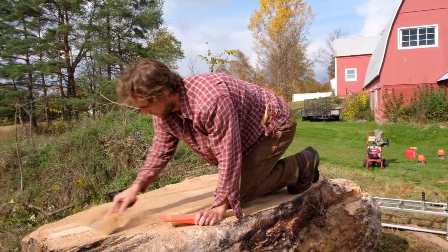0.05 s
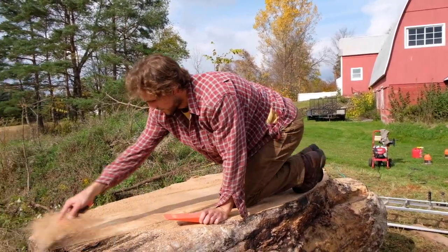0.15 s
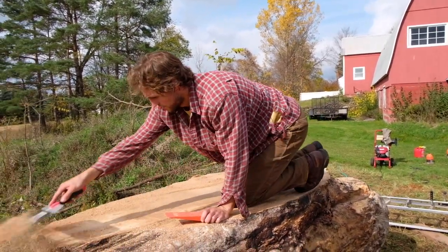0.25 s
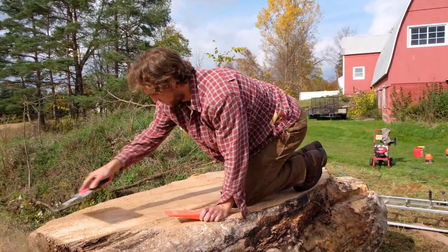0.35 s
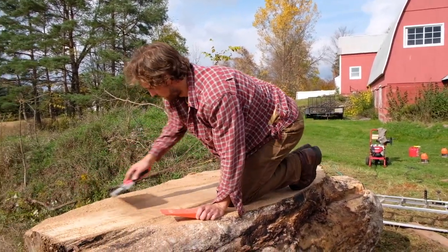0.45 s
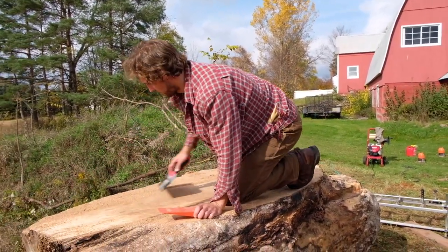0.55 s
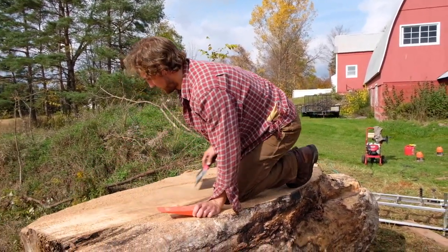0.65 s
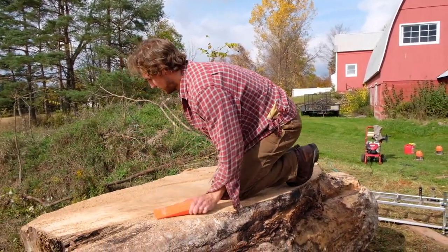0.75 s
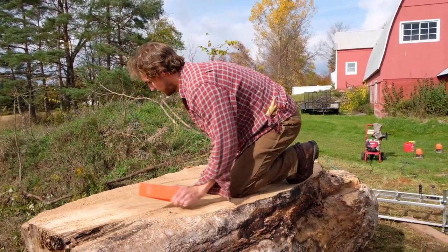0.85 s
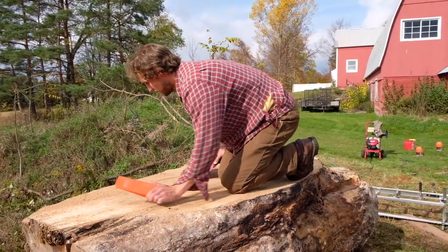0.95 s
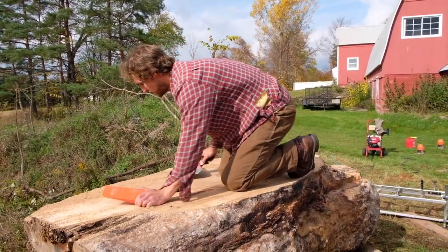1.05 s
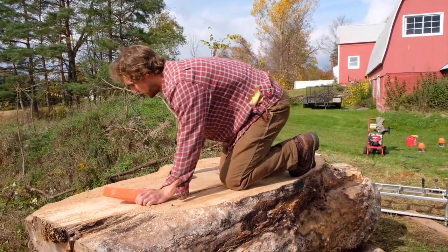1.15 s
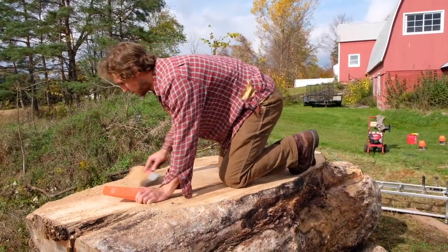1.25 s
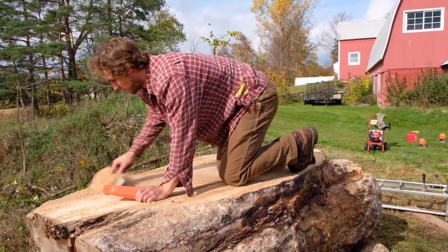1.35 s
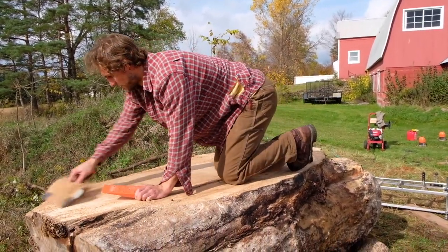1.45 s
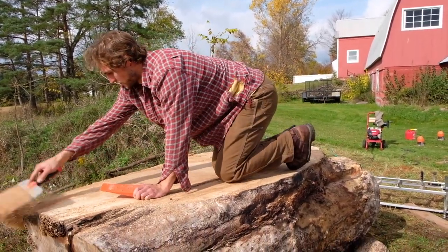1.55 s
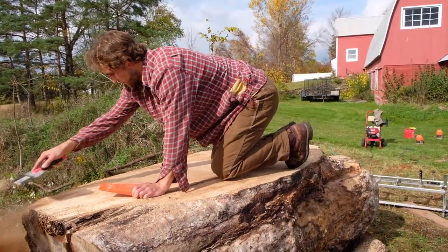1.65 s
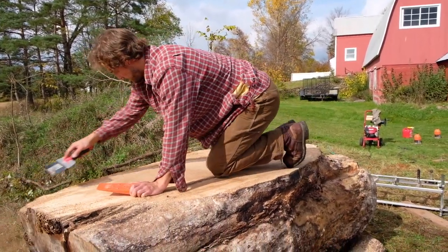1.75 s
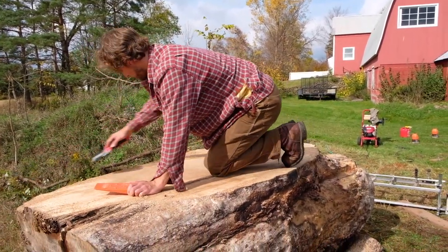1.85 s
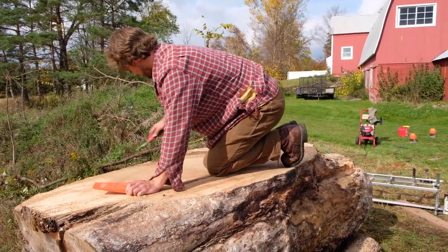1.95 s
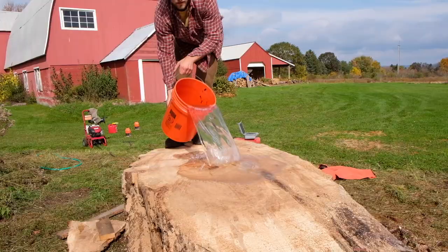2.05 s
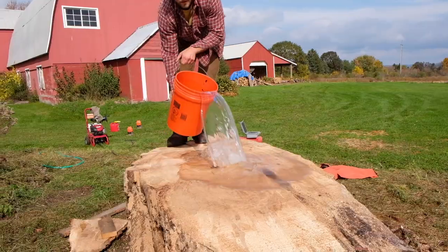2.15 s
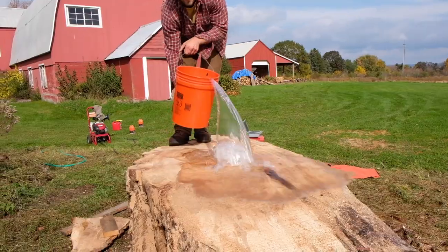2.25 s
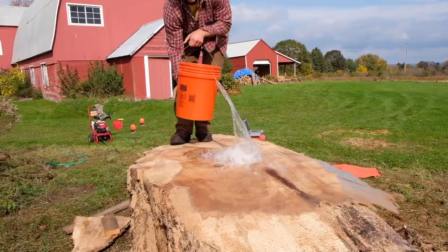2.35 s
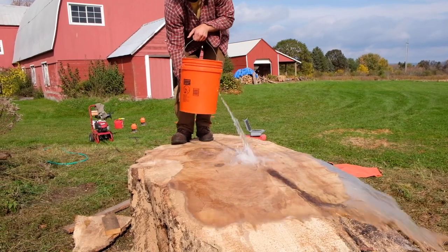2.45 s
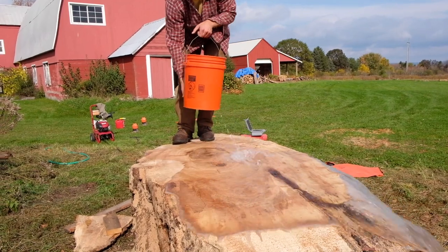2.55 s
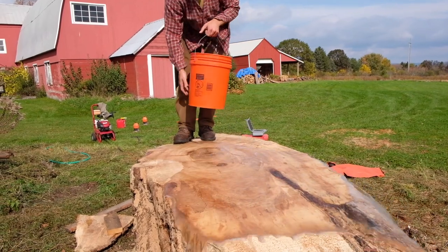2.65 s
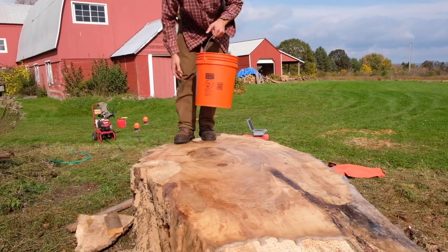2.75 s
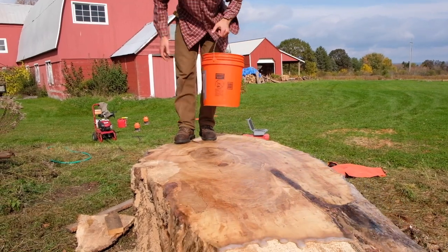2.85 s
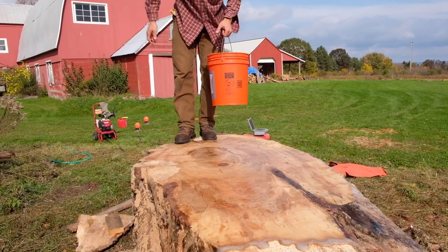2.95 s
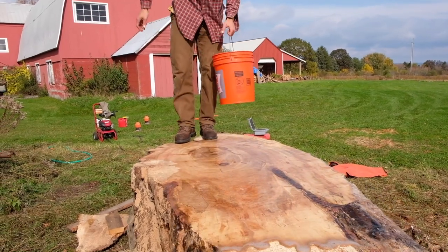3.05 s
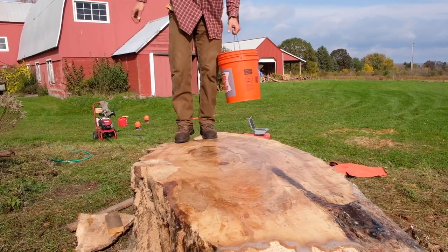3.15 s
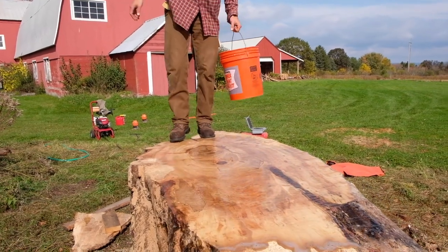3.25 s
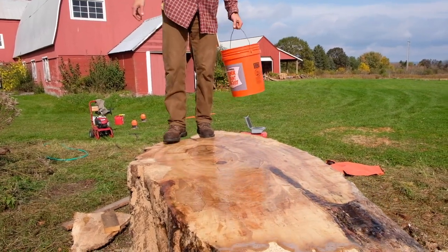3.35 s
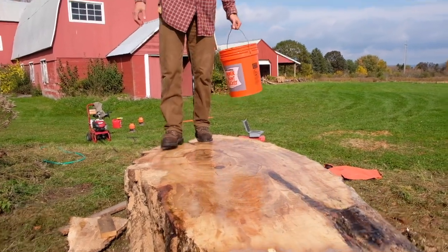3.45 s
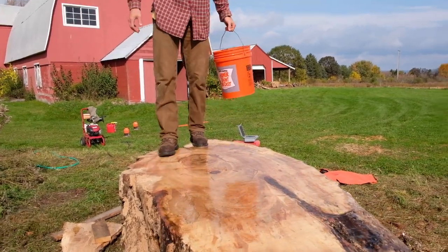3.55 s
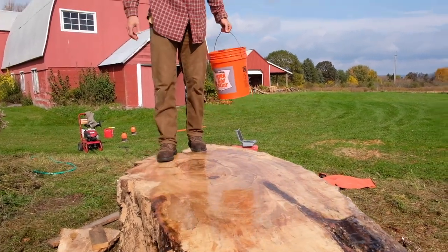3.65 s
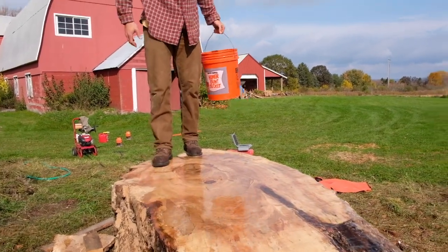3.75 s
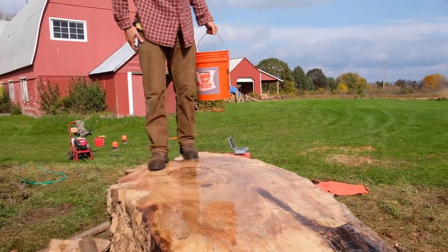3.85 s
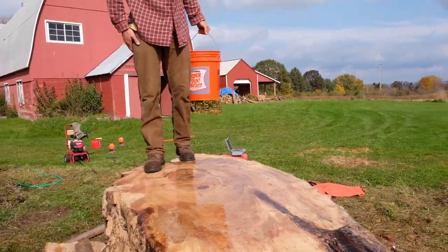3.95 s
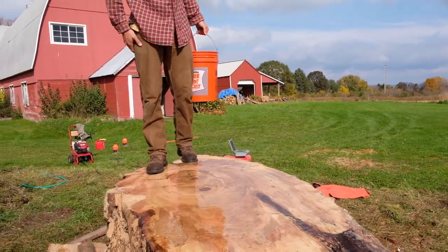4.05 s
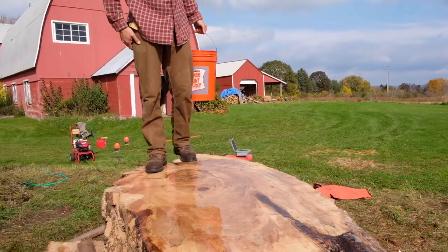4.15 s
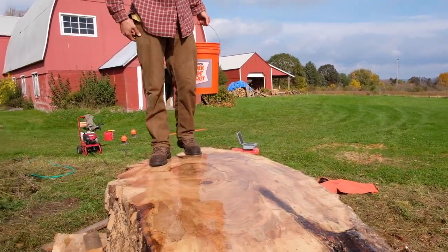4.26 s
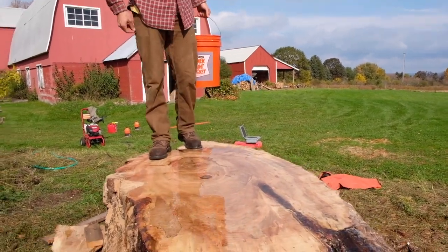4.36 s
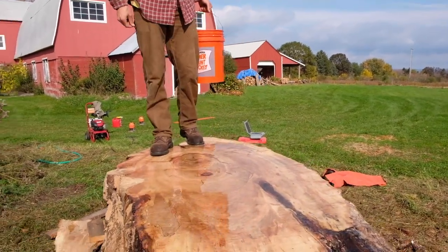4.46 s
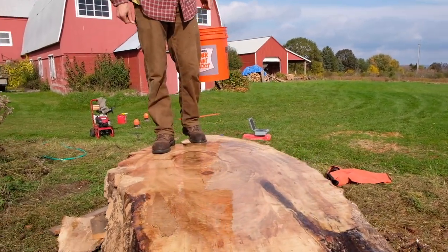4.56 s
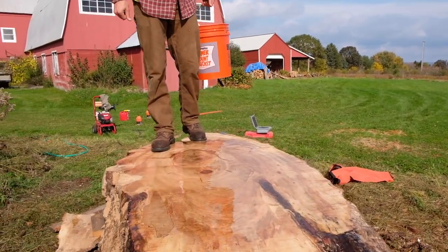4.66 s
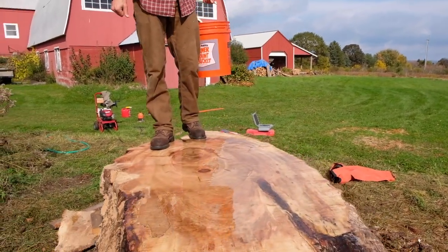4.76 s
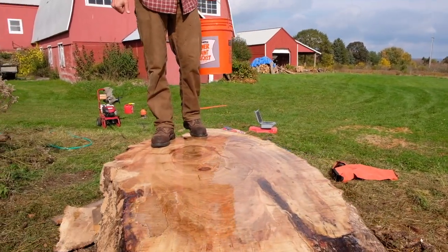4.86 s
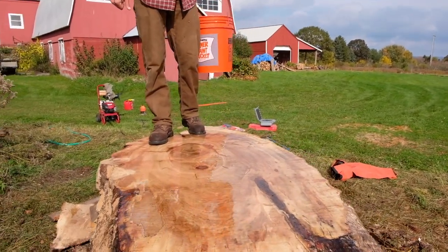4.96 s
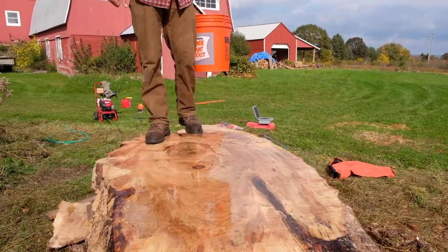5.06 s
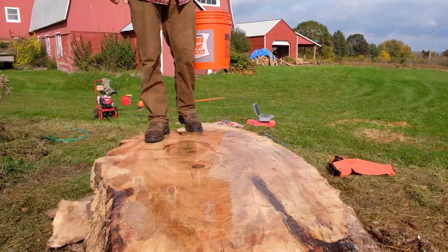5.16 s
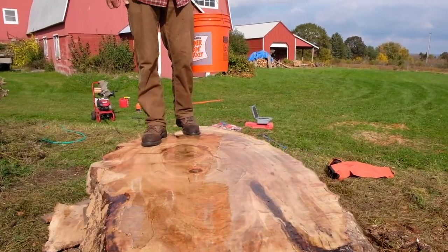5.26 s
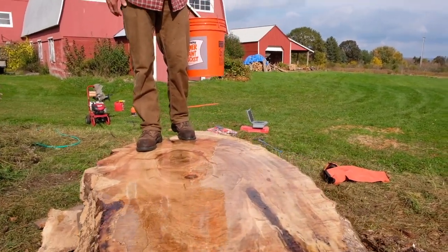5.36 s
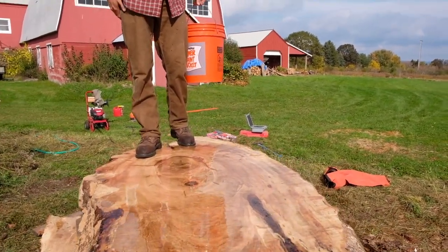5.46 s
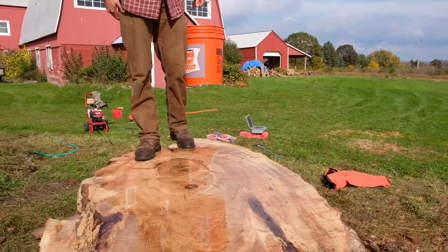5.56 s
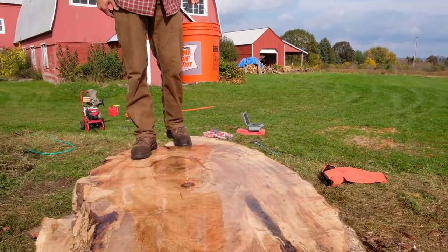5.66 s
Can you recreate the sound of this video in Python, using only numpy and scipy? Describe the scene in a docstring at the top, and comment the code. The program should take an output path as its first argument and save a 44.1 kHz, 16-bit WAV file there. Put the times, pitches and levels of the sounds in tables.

```python
"""A hand brush sweeps sawdust off a sawn slab in two brisk strokes, the first already under way: bristles are
showers of tiny impacts, ringing through handle and wood. Then a bucket of water is poured on the wood, made of
impacts and bubbles; the last slug lands with a thud, the water spills over the edge in surges, spatters on the
ground and drips away. A few dull knocks of boots and bucket follow as damped rings. Quiet country air is
coloured noise, a far rumble and a breeze in the grass; the background steps up at 2.1 s."""
import sys
import numpy as np
from scipy import signal
from scipy.fft import rfft, irfft
from scipy.io import wavfile
from scipy.ndimage import uniform_filter1d

SR = 44100
rng = np.random.default_rng(int(sys.argv[2]) if len(sys.argv) > 2 else 0)


def file_out(sig):
    """Save sig as 16-bit WAV at sys.argv[1]."""
    # one column per channel
    cols = np.atleast_2d(sig).T
    # limit, then scale
    lim = np.clip(cols, -1, 1)
    pcm = np.round(lim * 32767).astype(np.int16)
    wavfile.write(sys.argv[1], SR, pcm)


N = 251370
T = np.arange(N) / SR
FREQS = np.fft.rfftfreq(N, 1 / SR)
SIDES = np.array([[1], [-1]])  # left, right


def amp(db):
    """Decibels to gain."""
    return 10 ** (np.asarray(db) / 20)


def gains(rows):
    """Gain curves over time from rows of start_s and one or more level_db."""
    s, *columns = np.transpose(rows)
    return [amp(np.interp(T, s, column)) for column in columns]


def colour(x, points):
    """Filter by a spectrum of (Hz, dB) points; minimum phase, so that clicks keep their sharp front."""
    hz, db = np.transpose(points)
    size = 4096
    grid_hz = np.fft.rfftfreq(size, 1 / SR)
    curve_db = np.interp(np.log(grid_hz + 1), np.log(hz), db)
    # fold the cepstrum forward in time to get the minimum-phase response
    cepstrum = irfft(np.log(amp(curve_db)))
    cepstrum[1:size // 2] *= 2
    cepstrum[size // 2 + 1:] = 0
    response = irfft(np.exp(rfft(cepstrum)))
    return irfft(rfft(x) * rfft(response, N), N)


def unit(x, band=(20, 20000)):
    """Scale to rms 1 within a band in Hz."""
    inside = (FREQS > band[0]) & (FREQS < band[1])
    return x / np.sqrt(np.mean(irfft(rfft(x) * inside, N) ** 2))


def resonate(x, hz, width_hz):
    """Two-pole resonance, gain 1 at the centre."""
    b, a = signal.iirpeak(hz, hz / min(width_hz, SR / 4), fs=SR)
    return signal.lfilter(b, a, x)


def walk(rate):
    """Smooth random drift, spread near 1, from random steps at a rate per second."""
    k = int(SR / rate)
    steps = np.repeat(rng.standard_normal(N // k + 1), k)
    return 1.3 * uniform_filter1d(uniform_filter1d(steps, k), k)[:N]


def impacts(rate, spread_db):
    """Tiny random impacts, rate a second, a few much larger than the rest."""
    size = amp(spread_db * np.minimum(rng.standard_exponential(N), 4))
    return (rng.random(N) < rate / SR) * rng.choice([-1, 1], N) * size


def ping(hz, cycles, glide=0):
    """A short ring that swells for some cycles and dies; its pitch may glide up."""
    samples = np.arange(int(10 * cycles / hz * SR))
    age = samples / SR * hz / cycles  # 1 at the crest
    return age * np.exp(1 - age) * np.sin(2 * np.pi * cycles * age * (1 + glide * age / 10))


def add(track, s, sound):
    """Mix a sound into a track at a time in seconds."""
    i = max(int(s * SR), 0)
    track[..., i:i + sound.shape[-1]] += sound[..., :max(N - i, 0)]


def bubbles(low_hz, high_hz, cycles, spread_db, count):
    """A steady cloud of bubbles of many sizes, each a ping of rising pitch."""
    out = np.zeros(N)
    for when, pitch, life, size in rng.random((count, 4)):
        gain = amp(-spread_db * np.log(size + .04))
        hz = low_hz * (high_hz / low_hz) ** pitch
        add(out, when * N / SR, gain * ping(hz, cycles * (.5 + life), glide=0.18))
    return unit(out)


def splats(rate):
    """Drops that each burst into a millisecond of fresh spray."""
    hits = impacts(rate, spread_db=5.3) / np.sqrt(rate)
    keep = np.exp(-1 / (.001 * SR))
    burst = np.sqrt(signal.lfilter([1 - keep], [1, -keep], hits ** 2))
    return unit(hits + burst * rng.standard_normal(N))


def spread(make, width):
    """Stereo from two draws of a source: one is common, the other differs between the ears."""
    return make() + SIDES * colour(make(), width)


def ramp(start_s, end_s):
    """Rises from 0 to 1 between two times."""
    return np.clip((T - start_s) / max(end_s - start_s, 1 / SR), 0, 1)


RELEASE_S = 0.0055  # bristles spring off the wood


def contact(start_s, end_s, attack_s):
    """1 between two times; swells in before and is cut fast after."""
    return np.exp(-np.maximum(start_s - T, 0) / attack_s - np.maximum(T - end_s, 0) / RELEASE_S)


# spectrum of the far rumble: pitch_hz [Hz], level_db [dB]
AIR_SPECTRUM = [(20, -20), (40, -7), (70, -2.5), (110, 1.5), (165, -4.5), (290, -9.5), (500, -13.5),
                (850, -13.5), (1100, -19), (2000, -23.5), (3200, -32), (5000, -37.5), (11000, -46),
                (15000, -61)]
AIR_DB = -57.5
# breeze in the grass, faint, with a step up in the background at 2.1 s, then wavering: start_s [s], level_db
# [dB]
BREEZE_LEVELS = [(0, -67.5), (2.1, -72), (2.2, -58), (4.8, -64), (5.2, -57.5), (5.7, -61)]
# spectrum of the breeze: pitch_hz [Hz], level_db [dB]
BREEZE_SPECTRUM = [(100, -15.5), (200, 1.5), (450, -3), (900, -2), (1500, -8.5), (3000, -33.5),
                   (8000, -31.5), (15000, -40.5)]
# side against mid, for rumble and breeze: pitch_hz [Hz], level_db [dB]
AIR_SIDE = [(30, -16), (110, -10.5), (400, -4.5), (1000, -9), (3000, 0), (15000, 2)]


def air():
    """Coloured noise: a far low rumble, and a breeze in the grass, faint until the background steps up at 2.1
    s, then wavering."""
    far = spread(lambda: unit(colour(rng.standard_normal(N), AIR_SPECTRUM)), AIR_SIDE)
    breeze = spread(lambda: unit(colour(rng.standard_normal(N), BREEZE_SPECTRUM)), AIR_SIDE)
    waver = amp(.8 * walk(5))
    return far * amp(AIR_DB + .5 * walk(5.48)) + breeze * gains(BREEZE_LEVELS)[0] * waver


def outdoors(x, wet_db, t60):
    """Thin, dull scatter from trees and barn walls: a decaying noise tail, t60 in seconds."""
    decay = amp(-60 * T / t60) * (1 - np.exp(-T / .015))
    tail = rng.standard_normal((2, N)) * decay
    tail = colour(tail, [(100, -4), (600, -0.5), (2000, -5.5), (4000, -9.5), (9000, -8)])
    tail = tail / np.sqrt(np.sum(tail ** 2) / 2)
    return x + amp(wet_db) * signal.fftconvolve(x.mean(0)[None], tail, axes=1)[:, :N]


# dull blows of brush, water slug, boots and bucket, levels before the final colour:
# start_s [s], level_db [dB], pitch_hz [Hz], swell [cycles]
DULL_BLOWS = [(.944, -43, 242, 1.4), (.944, -37.5, 490, 0.83), (.988, -43, 300, 1.3),
              (1.128, -33.5, 610, 1), (2.5868, -19, 254, 0.67), (2.598, -30, 174, 1.66),
              (2.601, -31.5, 391, 1.4), (3.604, -37.5, 194, 0.27), (4.148, -42.5, 470, 0.63),
              (5.261, -39, 453, 0.46), (5.271, -57, 273, 0.74), (5.493, -32, 523, 0.66),
              (5.6053, -27, 505, 0.51)]


def knocks():
    """Heavily damped blows, each with a low thump, a little grit and a weak rebound."""
    out, t = np.zeros(N), T[:2048]
    for s, db, hz, cycles in DULL_BLOWS:
        add(out, s, amp(db) * ping(hz, cycles))
        thump = ping(194, cycles=1.0)
        add(out, s, amp(db - 13.0) * thump)
        rebound = ping(hz, cycles=1.1)
        add(out, s + .011, amp(db - 19) * rebound)
        grit = resonate(rng.standard_normal(len(t)) * np.exp(-t / 0.0059), 1050, 500)
        add(out, s, amp(db - 5) * grit)
    # soft contact makes little treble, and small bodies radiate little deep bass
    out = colour(out, [(50, -48), (110, -0.5), (170, -1.5), (950, 4.0), (1800, -6), (5000, -22)])
    return np.array([out, out])


# sharp drops and ticks, levels before the final colour:
# start_s [s], level_db [dB], pitch_hz [Hz], left_minus_right_db [dB]
SHARP_TICKS = [(.831, -48.5, 3400, 4), (.901, -50, 5200, 12), (2.869, -36, 2470, -7),
               (2.925, -37, 5170, -9), (3.074, -35, 2650, 5), (3.161, -38, 3140, -6),
               (3.364, -37, 2940, -3), (3.499, -41, 3530, 5), (3.582, -38, 2980, 8),
               (3.6008, -36.5, 2810, -16), (3.608, -25, 2800, 6), (3.687, -44.5, 1780, 0),
               (3.98, -51, 1320, 0), (4.024, -50, 2020, 0), (4.274, -47, 3020, -1), (4.519, -48, 4100, 3),
               (4.56, -50, 3700, 0), (4.643, -51, 2110, 0), (5.032, -49.5, 3500, -10),
               (5.053, -48, 6540, -1), (5.262, -44, 1690, 3), (5.496, -48.5, 1870, 0)]


def ticks():
    """Single sharp contacts: one snap of a broad resonance, with a millisecond or two of fine crack."""
    out, t = np.zeros((2, N)), T[:1024]
    for s, db, hz, pan_db in SHARP_TICKS:
        gain = amp(db + SIDES * pan_db / 2)
        crack = resonate(rng.standard_normal(len(t)) * np.exp(-t / .0016), hz, 2400)
        add(out, s, gain * ping(hz, cycles=0.99))
        add(out, s, gain * amp(0.5) * crack / np.abs(crack).max())
    return colour(out, [(500, -18), (1000, 7), (1400, -0.5), (8000, -5.5), (15000, -26)])


EMPTY_S = 2.575  # the bucket is empty
# surges of water over the edge: crest_s [s], rise_s [s], spatter_db [dB], droplets_db [dB], soil_db [dB]
SURGES = [(2.38, 0.23, -65, -72, -49), (2.64, 0.017, -62, -47, -51), (2.898, 0.11, -50.5, -47.5, -48.5),
          (3.229, 0.17, -56.5, -48.5, -52), (3.88, 0.067, -80, -63, -75), (4.53, .1, -75, -74.5, -77)]
DRAIN_DB_PER_S = 37  # each surge dies away
# the wet slab drips on: one level each for spatter, droplets and soil [dB]
DRIP_LEVELS = (-72, -64.5, -72)
DRIPS_S, DRYING_DB_PER_S = 3.49, 6  # drips are in full, then dry up


def overflow():
    """Gains of spatter, droplets and soil: surges swell and drain, over drips that slowly dry up."""
    drips = ramp(EMPTY_S, DRIPS_S) * amp(-DRYING_DB_PER_S * np.maximum(T - DRIPS_S, 0))
    power = np.outer(amp(DRIP_LEVELS), drips) ** 2
    for crest_s, rise_s, *levels_db in SURGES:
        drain = amp(-DRAIN_DB_PER_S * np.maximum(T - crest_s, 0))
        surge = ramp(crest_s - rise_s, crest_s) * drain
        power = power + np.outer(amp(levels_db), surge) ** 2
    return np.sqrt(power)


# spectrum of the fine spatter: pitch_hz [Hz], level_db [dB]
SPATTER_SPECTRUM = [(1500, -29), (3500, 2), (6000, 3.5), (8000, -4), (10000, -4.5), (12500, -9),
                    (15000, -21)]
# spectrum of the larger droplets: pitch_hz [Hz], level_db [dB]
DROPLET_SPECTRUM = [(600, -26), (1400, -5.5), (2800, 0), (4200, -7), (8000, -17), (15000, -46)]
# spectrum of the patter on soil: pitch_hz [Hz], level_db [dB]
SOIL_SPECTRUM = [(90, -31), (160, 7), (260, 3), (480, 4), (780, 1), (1200, -0.5), (2200, -25), (4000, -71)]


def runoff():
    """Water spills off both sides of the slab; the spatter thins to single drips as the flow dies."""
    spatter_gain, droplet_gain, soil_gain = overflow()
    rate = 130 + 2000 * spatter_gain / spatter_gain.max()  # drops per second
    sides = []
    for side_db in (-1, 1):
        spray = unit(colour(splats(rate), SPATTER_SPECTRUM), (4500, 14000))
        drops = splats(rate) + .6 * bubbles(1200, 4200, cycles=1.2, spread_db=5.5, count=1100)
        drops = unit(colour(drops, DROPLET_SPECTRUM), (1400, 4000))
        sides.append(amp(side_db) * spray * spatter_gain + drops * droplet_gain)
    soil_width = [(200, -41), (1500, -14)]
    soil = spread(lambda: unit(colour(impacts(rate=700, spread_db=3.5), SOIL_SPECTRUM)), soil_width)
    return np.array(sides) + soil * soil_gain


POUR_S, TIPPING_S = 2.129, 0.2  # first water on the slab, time to full stream
FIRST_WATER_DB, TRAIL_OFF_DB_PER_S = -9.5, 124  # flow against the full stream
SPLASH_DB, GURGLE_DB = -39.5, -41.5
POOLING_DB_PER_S = 15  # the gurgle grows as water gathers under the jet


def stream():
    """Gains of splash and gurgle: the flow grows as the bucket tips, holds, and trails off when it is empty."""
    flow_db = FIRST_WATER_DB * (1 - ramp(POUR_S, POUR_S + TIPPING_S))
    flow_db = flow_db - TRAIL_OFF_DB_PER_S * np.maximum(T - EMPTY_S, 0)
    shallow_db = -POOLING_DB_PER_S * np.maximum(EMPTY_S - T, 0)
    levels_db = [SPLASH_DB + flow_db, GURGLE_DB + flow_db + shallow_db]
    return contact(POUR_S, T[-1], attack_s=0.0019) * amp(levels_db)


# spectrum of the splash: pitch_hz [Hz], level_db [dB]
SPLASH_SPECTRUM = [(80, -38), (400, -7), (800, -19), (1100, -12), (1400, -6.5), (1800, -4.5), (2700, -4),
                   (4100, -14.5), (5800, -18), (7500, -26.5), (10000, -34), (15000, -45)]
# large bubbles and plops, during the pour and after it:
# start_s [s], level_db [dB], pitch_hz [Hz], swell [cycles]
LARGE_PLOPS = [(2.191, -28, 1640, 4.1), (2.232, -29, 750, 2.6), (2.352, -34, 1170, 1.2),
               (2.479, -29.5, 2640, 2.9), (2.548, -26, 1113, 0.9), (2.581, -29, 1650, 5.4),
               (2.6305, -27, 1570, 2.6), (2.673, -34.5, 1980, 3.3), (2.731, -26, 3600, 0.7),
               (2.892, -37, 830, 3.3), (2.969, -40, 272, 2.3), (3.421, -39.5, 650, 2),
               (3.444, -39, 2380, 1.8), (3.462, -32, 3310, 1.5), (3.607, -32.5, 1510, 1.6),
               (5.677, -47, 1040, 1.1)]


def pour():
    """The stream slaps the slab in gushes of fizz and gurgle; large bubbles plop during the pour and after it."""
    splash_gain, gurgle_gain = stream()
    fizz = bubbles(900, 4500, cycles=1.8, spread_db=3.4, count=3500)
    spray = unit(impacts(rate=3200, spread_db=4)) + .6 * fizz
    splash = unit(colour(spray, SPLASH_SPECTRUM), (1200, 6000))
    gurgle = bubbles(340, 1400, cycles=.8, spread_db=1.8, count=7000)
    gurgle = unit(colour(gurgle, [(60, -30), (200, -9), (700, 6), (1500, 6.5)]))
    gush = amp(1.2 * walk(90))
    out = gush * (splash * splash_gain + gurgle * gurgle_gain)
    for s, db, hz, cycles in LARGE_PLOPS:
        add(out, s, amp(db) * ping(hz, cycles, glide=0.02))
    return out


# speed rises along a power curve, holds, then slows; levels are against full speed
TOUCH_DB, SPEED_UP_POWER, SLOWING_DB = -27, 1.99, -13
SETTLE_S = 0.018  # bristles settle on the wood
BODY_FOLLOW, HISS_FOLLOW = 0.64, 0.83  # dB of handle and wood, and of the tips, for each dB of scrape
BEND_DB_PER_S = 34  # the tips hiss less as the bristles bend over
PRESS_DB, PRESS_S = 6, 0.057  # handle and wood sound louder while the hand bears down


def stroke(touch_s, full_s, press_s, slowing_s, lift_s, scrape_db, handle_db, wood_db, tips_db):
    """Gains of scrape, handle, wood and tips: all follow the hand's speed, handle and wood its weight too."""
    speed_db = TOUCH_DB * (1 - ramp(touch_s, full_s) ** SPEED_UP_POWER)
    speed_db = speed_db + SLOWING_DB * ramp(slowing_s, lift_s)
    body_db = BODY_FOLLOW * speed_db + PRESS_DB * np.exp(-((T - press_s) / PRESS_S) ** 2)
    hiss_db = HISS_FOLLOW * speed_db - BEND_DB_PER_S * np.maximum(T - full_s, 0)
    levels_db = [scrape_db + speed_db, handle_db + body_db, wood_db + body_db, tips_db + hiss_db]
    return contact(touch_s, lift_s, SETTLE_S) * amp(levels_db)


# brush strokes: touch_s, full_speed_s, hardest_press_s, slowing_s, lift_s [s],
# scrape_db, handle_thrum_db, wood_rasp_db, tip_hiss_db [dB]
BRUSH_STROKES = [(-.3, 0.019, 0.0074, 0.17, 0.23, -24.5, -43, -42, -49),
                 (.948, 1.307, 1.504, 1.542, 1.595, -27.5, -41.5, -36.5, -52)]
# spectrum of the bristle scrape: pitch_hz [Hz], level_db [dB]
SCRAPE_SPECTRUM = [(80, -57), (350, -26), (700, -16.5), (1020, -10.5), (1250, -3.5), (1600, -2),
                   (2100, -4.5), (2750, -9.5), (3600, -11.5), (4200, -20.5), (5100, -23), (6600, -36),
                   (12000, -84)]
# spectrum of the hissing tips: pitch_hz [Hz], level_db [dB]
TIP_SPECTRUM = [(2500, -25), (3400, 7), (3750, 16.5), (4200, 15), (6000, 4.5), (7300, 0), (9500, -4.5),
                (12000, -22), (16000, -40)]
# resonances of the brush handle: pitch_hz [Hz], width_hz [Hz], level_db [dB]
HANDLE_MODES = [(238, 22, 0), (340, 78, 0), (386, 66, -2)]
# resonances of the wood under the bristles: pitch_hz [Hz], width_hz [Hz], level_db [dB]
WOOD_MODES = [(525, 77, -2), (660, 56, -2), (777, 154, 7), (890, 63, -5)]
# tufts that catch and spring free: start_s [s], level_db [dB], pitch_hz [Hz]
TUFT_SNAGS = [(0.058, -19, 1760), (.083, -15, 1670), (0.103, -19.5, 1580), (.1365, -16.5, 1940),
              (1.29, -21, 1500), (1.3749, -15.5, 1750), (1.470, -15.5, 1850), (1.497, -18, 1560),
              (1.539, -17, 1760), (1.585, -26.5, 1330)]
# a faint ring of the ferrule, just after the first stroke has lifted: pitch_hz [Hz], level_db [dB], t60_s [s]
FERRULE_RINGS = [(447, -47.5, .62), (750, -53, .3), (1384, -57, .35)]
FERRULE_S = 0.27  # start of the ring


def brush():
    """Bristles flick over saw marks in uneven bunches; wood and handle answer, the tips hiss through the dust."""
    scrape_gain, handle_gain, wood_gain, tip_gain = sum(stroke(*row) for row in BRUSH_STROKES)
    grip = amp(.7 * walk(170) + .3 * walk(35))  # uneven bunching
    scrape = colour(impacts(rate=14000, spread_db=2), SCRAPE_SPECTRUM)
    # the slab's reflection comes later or sooner as the hand moves, so the colour swirls
    lag = SR * .0022 * (1 + .15 * walk(12))
    reflection = np.interp(np.arange(N) - lag, np.arange(N), scrape)
    scrape = unit(scrape + .3 * reflection, (1000, 5000))
    # one push of impacts drives both bodies
    push = impacts(rate=5500, spread_db=4.0)
    handle = sum(amp(db) * resonate(push, hz, width) for hz, width, db in HANDLE_MODES)
    wood = sum(amp(db) * resonate(push, hz, width) for hz, width, db in WOOD_MODES)
    handle = unit(colour(handle, [(60, -51), (165, -10), (225, 7.5), (420, 4.0), (900, -9.0)]))
    wood = unit(colour(wood, [(150, -12.5), (480, 5.5), (950, -1.0), (2000, -20.0)]))
    tips = unit(colour(impacts(rate=7000, spread_db=3), TIP_SPECTRUM), (6000, 10000))
    out = grip * (scrape * scrape_gain + handle * handle_gain + wood * wood_gain + tips * tip_gain)
    for s, db, hz in TUFT_SNAGS:
        add(out, s, amp(db) * ping(hz, cycles=1.4))
    for hz, db, t60 in FERRULE_RINGS:
        add(out, FERRULE_S, amp(db - 60 * T / t60) * np.sin(2 * np.pi * hz * T))
    return out


# side against mid, for the brush: pitch_hz [Hz], level_db [dB]
BRUSH_SIDE = [(100, -39), (1500, -35.5), (3200, -21), (5000, -13.5), (8000, -5), (15000, 8)]
# side against mid, for the pour: pitch_hz [Hz], level_db [dB]
POUR_SIDE = [(100, -27), (1000, -35), (4500, -17), (8000, -11), (15000, -18)]


def scene():
    """Brushing, then rinsing, in the open air."""
    sweeping = outdoors(spread(brush, BRUSH_SIDE), wet_db=-22, t60=0.55)
    rinsing = outdoors(spread(pour, POUR_SIDE) + runoff() + ticks() + knocks(), wet_db=-35.0, t60=0.92)
    return sweeping + rinsing + air()


TOP_HZ = 15700


def record(dry):
    """A steep elliptic low-pass removes the top of the treble."""
    return signal.sosfilt(signal.ellip(8, .2, 70, TOP_HZ, fs=SR, output="sos"), dry)


dry = scene()
out = record(dry)
file_out(out)
```